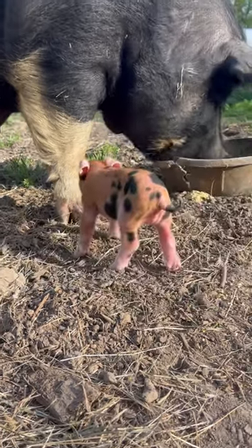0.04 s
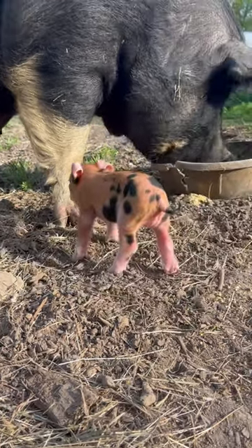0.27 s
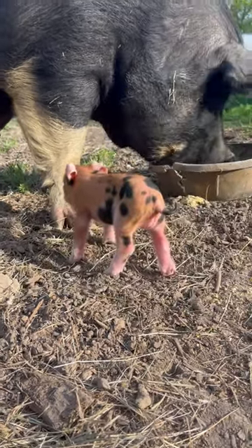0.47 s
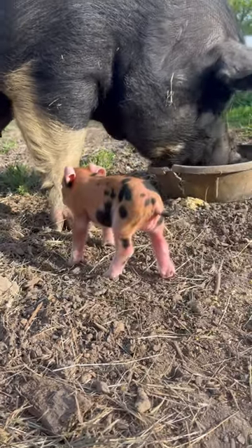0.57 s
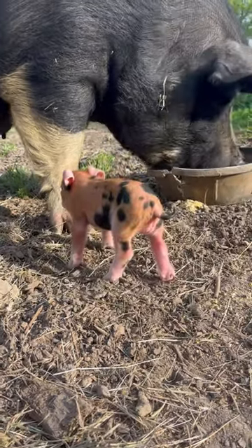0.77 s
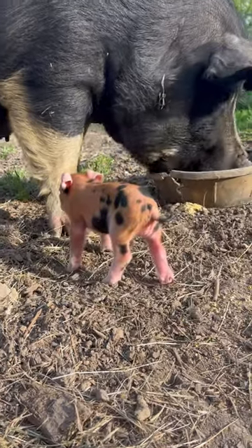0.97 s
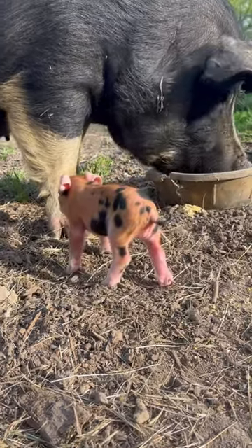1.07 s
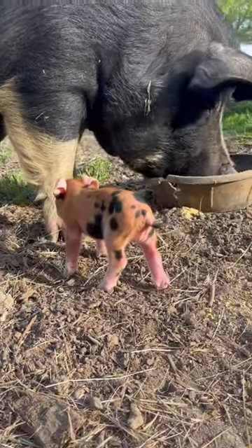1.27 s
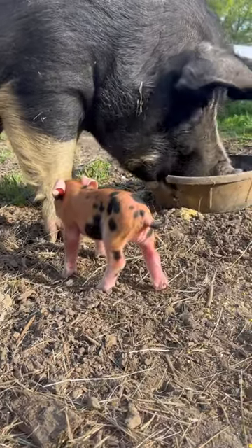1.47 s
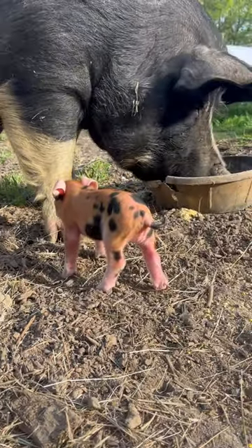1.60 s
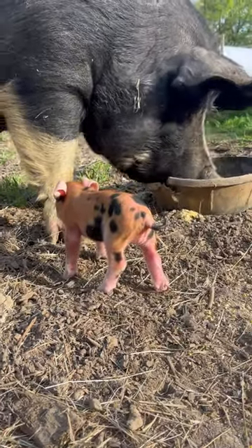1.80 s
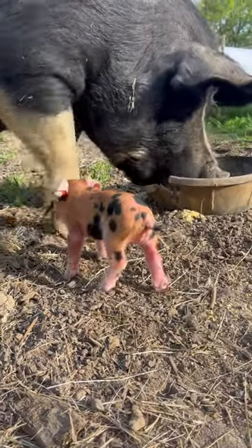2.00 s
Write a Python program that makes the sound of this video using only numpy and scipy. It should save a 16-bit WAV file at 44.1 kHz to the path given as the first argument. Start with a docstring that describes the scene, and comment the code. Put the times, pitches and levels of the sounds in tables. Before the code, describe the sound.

A sow grunts low and guttural: a fast rattle of five or six thumps at 0.15-0.38 s, a shorter grunt at 0.55-0.67, a rougher, more nasal one at 0.9-1.1, then a pause and a grunt building from 1.46 to 1.67. Faint nose air, wet smacks around 0.4, 0.8 and 2.0, tiny feed cracks, straw rustle, hiss and quiet outdoor rumble lie behind.

```python
"""A sow grunts four times over her feed tub, outdoors.
Each grunt is a slow rattle of throaty thumps: damped resonances of throat, snout, mouth and nose.
Shaped noise makes the air rushing through her nose, wet smacks, and cracks of feed and dry straw.
Straw rustle, a wavering hiss, steady yard noise and a low rumble lie behind."""
import sys
import numpy as np
from scipy import signal
from scipy.fft import rfft, irfft
from scipy.io import wavfile

SR = 44100
rng = np.random.default_rng(int(sys.argv[2]) if len(sys.argv) > 2 else 0)


def store_pcm(level_fs):
    """Save levels as 16-bit WAV."""
    pcm = np.round(np.clip(level_fs, -1, 1) * 32767).astype(np.int16)
    wavfile.write(sys.argv[1], SR, np.atleast_2d(pcm).T)


N = 90404
T = np.arange(N) / SR
HZ = np.fft.rfftfreq(N, 1 / SR)

# thumps of the grunts: t/s, throat, snout, mouth, nasal and rasp level/dB, snout tuning/ratio
GRUNT_THUMPS = [ (.155, -31.5, -33, -55, -58, -70, 1.057), (.203, -19.5, -19, -31.5, -48.5, -60.5, 1.014),
                (0.242, -18, -15.5, -50.5, -58, -56, 0.993), (.283, -16, -13.5, -36.5, -43.5, -57, 1.035),
                (0.327, -16.5, -14.5, -32.5, -47.5, -48, 1.035), (0.354, -33.5, -48, -52, -67.5, -68, 1),
                (0.553, -30, -32, -51, -57.5, -65, 1), (.579, -18.5, -15.5, -36.5, -46.5, -62, 1.009),
                (.617, -16.5, -24.5, -28, -40, -51, 1.042), (0.883, -32, -37.5, -54.5, -60, -71, 0.99),
                (0.941, -25.5, -36, -37, -40, -50.5, .97), (.971, -21, -34.5, -48, -48, -58, 0.82),
                (1.009, -16.5, -24, -27, -31.5, -42.5, 1), (1.098, -38.5, -44, -70, -44, -70, 0.71),
                (1.463, -36.5, -47, -40, -60, -66, 0.95), (1.487, -28.5, -43, -47.5, -52, -49.5, 1),
                (1.524, -31, -34.5, -42.5, -41.5, -55.5, .93), (1.546, -24, -46, -43, -62, -72, 0.93),
                (1.57, -22, -25.5, -33.5, -49.5, -70, 0.666), (1.610, -16, -26, -27.5, -35, -64, 0.98)]
# throat, snout, mouth, nose: base f/Hz, rise/s, ring/s, sharpness at start/share of f, lingering level/dB
AIRWAY_MODES = [(119.7, 0.0096, 0.02, 0.84, -35.5), (401.6, 0.0059, 0.018, 0.15, -34.5),
                (793.6, 0.0051, 0.012, 0.025, -12.5), (1500, 0.0043, 0.0076, 0.025, -23.5)]
# whistles of the nostrils: f/Hz, level re rasp/dB (before brightening)
NOSTRIL_WHISTLES = [(3150, 5), (3900, -7)]
# spectrum of the throat flutter: f/Hz, level/dB
FLUTTER_COLOUR = [(30, -10.5), (65, 10), (150, -4), (300, 4), (450, -10.5), (620, -13), (820, -8.5),
                  (1150, -62.5)]
# spectrum of the scrape in the nose: f/Hz, level/dB
SCRAPE_COLOUR = [(900, -41), (1330, 3), (1620, 2.5), (2100, -21.5), (4000, -50.5)]
# spectrum of the rasp: f/Hz, level/dB
RASP_SPECTRUM = [(900, -30.5), (1800, 6.5), (2700, -5.5), (3400, 6), (4900, -7.5), (5700, -22),
                 (14000, -20)]
# grunts at the two microphones: f/Hz, left lead/rad
GRUNT_LEAD = [(20, -1.5), (150, 0.21), (430, 0.37), (800, 0.28), (1500, -1), (2700, -4.5), (4000, -4),
              (6200, -13.5)]
# grunts at the two microphones: f/Hz, left-right level/dB
GRUNT_BALANCE = [(60, 2.5), (150, -1), (440, -2), (850, 3.5), (1600, 3), (3300, -3.5), (7000, -0.5)]
# rush of nose air: t/s, level/dB
AIR_LEVEL = [(0, -51), (.15, -56.5), (.34, -62), (.385, -43.5), (.50, -43.5), (.56, -48.5), (.62, -55.5),
             (.68, -46), (.73, -51), (.77, -66), (.9, -54), (1.08, -57.5), (1.17, -68), (1.40, -54.5),
             (1.47, -56.5), (1.68, -51.5), (1.76, -69.5), (1.9, -60), (2.05, -49.5)]
# spectrum of the rush: f/Hz, level/dB
AIR_SPECTRUM = [(120, -21), (280, -1.5), (450, 3.5), (650, -6.5), (830, -3.5), (1130, -16), (1450, -11),
                (2250, -9.5), (3000, -26), (3800, -25), (5000, -31.5), (6200, -56)]
# snout and mouth rings under the rush: f/Hz, width/Hz, level/dB
AIR_RINGS = [(446, 21.7, -1.5), (813.6, 25, -6.5)]
# cracks of feed and straw: t/s, level/dB, decay/s
FEED_CRACKS = [(.129, -55.5, 0.0012), (.531, -55.5, 0.0012), (0.7164, -48, 0.0011), (0.804, -44.5, 0.0006),
               (1.047, -50, 0.0021), (1.096, -54.5, 0.004), (1.314, -57, 0.00079), (1.3306, -48, 0.0022),
               (1.488, -48.5, 0.0027), (1.705, -54.5, 0.0026)]
# spectrum of the cracks: f/Hz, level/dB
CRACK_SPECTRUM = [(500, -7), (3300, -8), (5200, 1.5), (8000, -0.5), (15000, -6)]
# wet smacks of chewing: centre t/s, level/dB, length/s
CHEWING_SMACKS = [(0.405, -42.5, 0.0032), (0.823, -45.5, 0.0087), (1.098, -46.5, 0.0081),
                  (1.475, -48.5, 0.017), (1.707, -50, 0.0051), (2.038, -43.5, 0.0039)]
# spectrum of the smacks: f/Hz, level/dB
SMACK_SPECTRUM = [(200, -31), (720, 13), (1050, -3), (1500, 2.5), (2100, -2), (2700, -9), (7000, -22.5),
                  (15000, -45)]
# straw rustle before trim: t/s, level/dB
RUSTLE_CURVE = [(0, -50), (.14, -53), (.36, -61), (.62, -71), (.83, -55), (1.0, -63.5), (1.25, -78.5),
                (1.46, -58.5), (1.7, -63.5), (1.85, -59.5), (2.05, -72)]
# spectrum of the rustle: f/Hz, level/dB
RUSTLE_SPECTRUM = [(900, -31), (1600, 1), (2600, -7), (3600, 10), (4400, 1.5), (5500, -14), (9000, -25)]
# treble hiss before trim: t/s, level/dB
HISS_CURVE = [(0, -63), (.21, -70.5), (.35, -78), (.41, -66), (.49, -61), (.60, -73), (.64, -76),
              (.69, -63), (.77, -82), (.87, -75.5), (.93, -64.5), (1.07, -66.5), (1.27, -76), (1.40, -76),
              (1.48, -63.5), (1.58, -71.5), (1.76, -75), (1.95, -72.5), (2.04, -58)]
# spectrum of the hiss: f/Hz, level/dB
HISS_SPECTRUM = [(2000, -2), (4000, 0), (5500, 5), (8000, 2), (12000, -3), (13500, 1), (14500, -11),
                 (16000, -32.5)]
# motion spectrum of the grain in rustle and hiss: f/Hz, level/dB
GRAIN_COLOUR = [(20, -2.5), (300, -17.5), (1200, -32), (5000, -83.0)]
# spectrum of the steady yard noise: f/Hz, level/dB
YARD_SPECTRUM = [(120, -19), (200, 2.5), (290, -8), (430, -9), (650, -26.5), (870, -19), (1100, -15.5),
                 (1400, -11.5), (3000, -25), (6000, -49), (13000, -46)]
# outdoor rumble: t/s, level/dB
RUMBLE_CURVE = [(0, -44.5), (.4, -40), (.52, -47), (.66, -40.5), (.8, -49), (1.0, -41), (1.14, -42),
                (1.3, -50.5), (1.38, -49.5), (1.45, -33.5), (1.52, -35), (1.68, -42.5), (1.81, -44.5),
                (1.87, -36.5), (1.93, -45), (2.05, -45)]
# spectrum of the rumble: f/Hz, level/dB
RUMBLE_SPECTRUM = [(15, -48.5), (30, -28), (45, 0), (58, 2.5), (95, 2), (140, -7.5), (200, -13.5),
                   (320, -24), (700, -49)]
# surroundings at the two microphones: f/Hz, left-right level/dB
WIDE_BALANCE = [(60, -0.1), (440, -2.5), (900, 5.5), (1500, 2), (2600, -2.5), (4000, -1), (7000, 0.5)]
# likeness of the two channels: f/Hz, coherence/1
COHERENCE = [(60, .999), (250, 0.98), (800, 0.88), (2000, 0.38), (4000, 0.67), (7000, 1), (13000, 1)]

# grunts
SETTLE_S, LINGER_S = 0.011, 0.013
CLOSING_POWER, ROUGHNESS, RING_SPREAD = 2.82, 0.06, 0.062  # spread: log of the ring time
FLUTTER_DB, FLUTTER_RISE_S, FLUTTER_DECAY_S = -6.5, 0.0015, 0.01
NOSE_LAG_S, NOSE_RISE_PER_DB, FULL_THROAT_DB = 0.002007, .007, -16  # weak thumps ring the nose higher
BRIGHTEN, FULL_RASP_DB = 2.4, -42.5  # extra whistle dB per dB of rasp
SCRAPE_DB, SCRAPE_PEAK_S, RASP_PEAK_S = -9, 0.0036, 0.0027
ECHO_DB, ECHO_T60_S, ECHO_DELAY_S = -17.5, 0.09, 0.012

# nose air and feed
AIR_WANDER, AIR_WANDER_HZ = .035, 3.06  # rms share of pitch, rate
AIR_GRAIN_DB, AIR_GRAIN_HZ, AIR_GRAIN_FROM_HZ = 3.5, 110, 1500
CRUMB_DB, CRUMB_DECAY_S, CRUMB_GRAIN_DB, CRUMB_RATE_HZ = -16, 0.01, 7.5, 550

# background, microphones
RUSTLE_TRIM_DB, HISS_TRIM_DB, YARD_DB, GRAIN_DB = -10, -0.5, -58, 2
PATCH_HZ, PATCH_S, PATCH_DB, PATCH_FROM_HZ = 168, 0.077, 3.5, 240
LAG_S, LAG_FROM_HZ = .000245, 1720
LOW_CUT_HZ, EDGE_HZ = 30, 14400


def amp(db):
    """Decibels to gain."""
    return 10 ** (np.asarray(db) / 20)


def unit(x):
    """Scales to rms 1."""
    return x / np.sqrt(np.mean(x ** 2) + 1e-20)


def read(points):
    """A table over frequency, on every bin."""
    f, value = np.transpose(points)
    return np.interp(np.log(HZ + 1), np.log(f + 1), value)


def level(points):
    """A dB curve over time as a gain."""
    return amp(np.interp(T, *np.transpose(points)))


def add(mix, s, sound):
    """Mixes a sound in at time s."""
    part = mix[max(round(s * SR), 0):][:len(sound)]
    part += sound[:len(part)]


def noise(colour):
    """Noise of a given spectrum, rms 1."""
    return unit(irfft(rfft(rng.standard_normal(N)) * amp(read(colour)), N))


def wobble(hz):
    """Random motion up to a given rate, rms 1."""
    return unit(irfft(rfft(rng.standard_normal(N)) / (1 + (HZ / hz) ** 2), N))


def swell(t, peak_s):
    """A burst that peaks at peak_s and dies away."""
    return (t / peak_s * np.exp(1 - t / peak_s)) ** 2


def ports(left, right, lead_rad, balance_db):
    """Two spectra as heard at the two microphones."""
    lean = amp(balance_db / 2) * np.exp(.5j * lead_rad)
    return irfft(np.array([left * lean, right / lean]), N)


def wide_noise(gain):
    """Surrounding noise, partly alike in both channels; its treble reaches the right first."""
    a, b = rfft(rng.standard_normal((2, N))) * gain
    c = np.clip(read(COHERENCE), 0, 1)
    other = c * a + np.sqrt(1 - c ** 2) * b
    lead_rad = -2 * np.pi * HZ * LAG_S * (1 - np.exp(-(HZ / LAG_FROM_HZ) ** 2))
    return unit(ports(a, other, lead_rad, read(WIDE_BALANCE)))


def ring(t, hz, rise_s, ring_s, sharp, linger_db):
    """One resonance swells, sinks in pitch and is damped as the throat closes; a little lingers."""
    turns = np.cumsum(hz * (1 + sharp * np.exp(-t / SETTLE_S))) / SR
    fade = np.exp(-(t / ring_s) ** CLOSING_POWER) + amp(linger_db) * np.exp(-t / LINGER_S)
    shape = np.sin(np.pi / 2 * np.minimum(t / rise_s, 1)) ** 2 * fade
    lowpass = signal.butter(2, hz / 4, fs=SR, output="sos")
    rough = unit(signal.sosfilt(lowpass, rng.standard_normal(len(t))))
    return shape / shape.max() * (1 + ROUGHNESS * rough) * np.sin(2 * np.pi * turns)


def grunts():
    """Thumps ring throat, snout and mouth with a low flutter and a nasal scrape;
    nose ring, whistles and rasp follow just after."""
    t = np.arange(SR // 10) / SR
    voice, puffs, scrapes, rasps = np.zeros((4, N))
    *lower, (nose_hz, *nose_shape) = AIRWAY_MODES
    for s, throat_db, snout_db, mouth_db, nasal_db, rasp_db, tuning in GRUNT_THUMPS:
        levels_db = (throat_db, snout_db, mouth_db)
        for (hz, rise_s, ring_s, sharp, linger_db), db, ratio in zip(lower, levels_db, (1, tuning, 1)):
            slide = max(1 / ratio - 1, 0)  # a slack snout slides down from its usual pitch
            varied_s = ring_s * np.exp(RING_SPREAD * rng.standard_normal())
            add(voice, s, amp(db) * ring(t, hz * ratio, rise_s, varied_s, sharp + slide, linger_db))

        puff = np.minimum(t / FLUTTER_RISE_S, 1) * np.exp(-t / FLUTTER_DECAY_S)
        add(puffs, s, amp(throat_db + FLUTTER_DB) * puff)
        add(scrapes, s, amp(nasal_db + SCRAPE_DB) * swell(t, SCRAPE_PEAK_S))

        nose_s = s + NOSE_LAG_S
        raised_hz = nose_hz * (1 + NOSE_RISE_PER_DB * (FULL_THROAT_DB - throat_db))
        add(voice, nose_s, amp(nasal_db) * ring(t, raised_hz, *nose_shape))
        for hz, db in NOSTRIL_WHISTLES:
            whistle_db = rasp_db + db + BRIGHTEN * (rasp_db - FULL_RASP_DB)
            add(voice, nose_s, amp(whistle_db) * ring(t, hz, *nose_shape))
        add(rasps, nose_s, amp(rasp_db) * swell(t, RASP_PEAK_S))
    flutter = puffs * noise(FLUTTER_COLOUR)
    return voice + flutter + scrapes * noise(SCRAPE_COLOUR) + rasps * noise(RASP_SPECTRUM)


def yard_echo(voice):
    """The direct sound and a brief scatter from ground, tub and fence, as decaying noise."""
    onset = np.clip(T / ECHO_DELAY_S - 1, 0, 1)
    tail = rng.standard_normal((3, N)) * amp(-60 * T / ECHO_T60_S) * onset
    tail = rfft(tail / np.linalg.norm(tail[0]))
    c = np.clip(read(COHERENCE), 0, 1)
    scatter = np.sqrt(c) * tail[0] + np.sqrt(1 - c) * tail[1:]  # shared and separate parts
    paths = rfft(voice) * (1 + amp(ECHO_DB) * scatter)
    return ports(*paths, read(GRUNT_LEAD), read(GRUNT_BALANCE))


def nose_air():
    """Turbulent air lightly rings the moving snout and mouth; its upper part sputters in the wet nostrils."""
    rings = sum(amp(db) * wide_noise(1 / (1 + ((HZ - hz) / width) ** 2)) for hz, width, db in AIR_RINGS)
    clock = T + np.cumsum(AIR_WANDER * wobble(AIR_WANDER_HZ)) / SR  # uneven reading bends the pitch
    rings = np.array([np.interp(clock, T, side, period=N / SR) for side in rings])
    rush = wide_noise(amp(read(AIR_SPECTRUM)))
    low = irfft(rfft(rush) * np.exp(-(HZ / AIR_GRAIN_FROM_HZ) ** 2), N)
    sputter = unit(amp(AIR_GRAIN_DB * wobble(AIR_GRAIN_HZ)))
    return level(AIR_LEVEL) * (rings + low + (rush - low) * sputter)


def chewing_smacks(crumbs):
    """Soft smacks of the snout in the feed: grainy noise under bell-shaped bursts."""
    bursts = sum(amp(db) * np.exp(-((T - s) / length_s) ** 2) for s, db, length_s in CHEWING_SMACKS)
    return crumbs * bursts * wide_noise(amp(read(SMACK_SPECTRUM)))


def feed_cracks(crumbs):
    """Sudden noise bursts decay fast and trail off in crumbs."""
    bursts = np.zeros(N)
    for s, db, decay_s in FEED_CRACKS:
        local_crumbs = np.roll(crumbs, -round(s * SR))
        trail = amp(CRUMB_DB) * np.exp(-T / CRUMB_DECAY_S) * local_crumbs
        add(bursts, s, amp(db) * (np.exp(-T / decay_s) + trail))
    return bursts * wide_noise(amp(read(CRACK_SPECTRUM)))


def feeding():
    """Smacks and cracks share one random grain of crumbs."""
    crumbs = unit(amp(CRUMB_GRAIN_DB * np.clip(wobble(CRUMB_RATE_HZ), -2, 2)))
    return chewing_smacks(crumbs) + feed_cracks(crumbs)


def rustle_and_hiss():
    """Straw rustle and a treble hiss come and go, roughened by one random grain."""
    grain = unit(amp(GRAIN_DB * noise(GRAIN_COLOUR)))
    rustle = amp(RUSTLE_TRIM_DB) * level(RUSTLE_CURVE) * wide_noise(amp(read(RUSTLE_SPECTRUM)))
    hiss = amp(HISS_TRIM_DB) * level(HISS_CURVE) * wide_noise(amp(read(HISS_SPECTRUM)))
    return grain * (rustle + hiss)


def yard_noise():
    """Steady broadband noise of the yard."""
    return amp(YARD_DB) * wide_noise(amp(read(YARD_SPECTRUM)))


def rumble():
    """Low outdoor noise that rises and falls."""
    return level(RUMBLE_CURVE) * wide_noise(amp(read(RUMBLE_SPECTRUM)) / (1 + (HZ / 1000) ** 2))


def patchy(x):
    """Turbulence: narrow bands swell and fade on their own, more so above the lows."""
    hz, t, z = signal.stft(x, SR, nperseg=512)
    field = rng.standard_normal(z.shape[1:])
    for axis, step in enumerate((hz[1] / PATCH_HZ, t[1] / PATCH_S)):
        field = signal.lfilter([1], [1, -np.exp(-step)], field, axis=axis)
    depth = (hz ** 2 / (hz ** 2 + PATCH_FROM_HZ ** 2))[:, None]
    return signal.istft(z * amp(PATCH_DB * depth * unit(field)), SR, nperseg=512)[1][:, :N]


def scene():
    """The sow at her tub in the open yard."""
    surroundings = nose_air() + feeding() + rustle_and_hiss() + yard_noise() + rumble()
    return yard_echo(grunts()) + patchy(surroundings)


def record(dry):
    """The recorder's band limits."""
    low_cut = signal.butter(5, LOW_CUT_HZ, "high", fs=SR, output="sos")
    high_cut = signal.firwin(255, EDGE_HZ, window=("kaiser", 8), fs=SR)
    return signal.oaconvolve(signal.sosfilt(low_cut, dry), high_cut[None], "same")


dry = scene()
out = record(dry)
store_pcm(out)
```